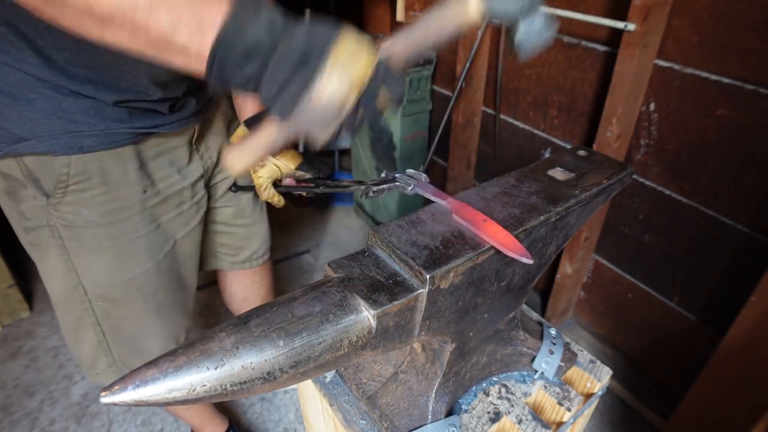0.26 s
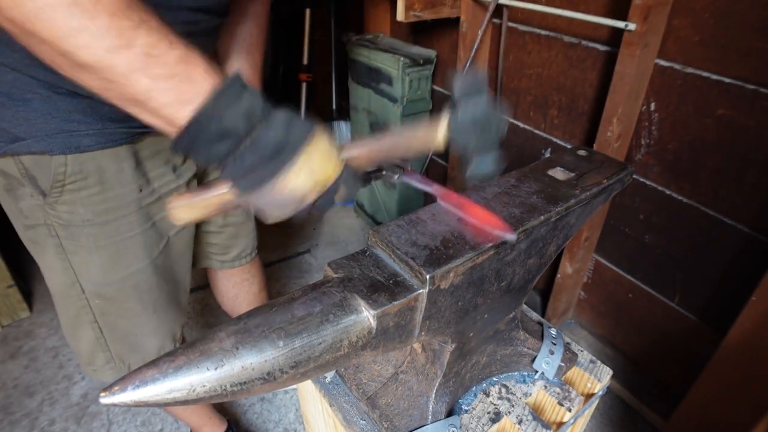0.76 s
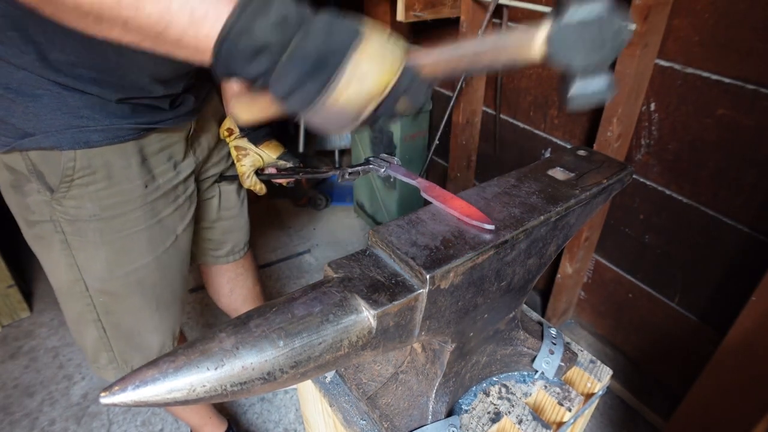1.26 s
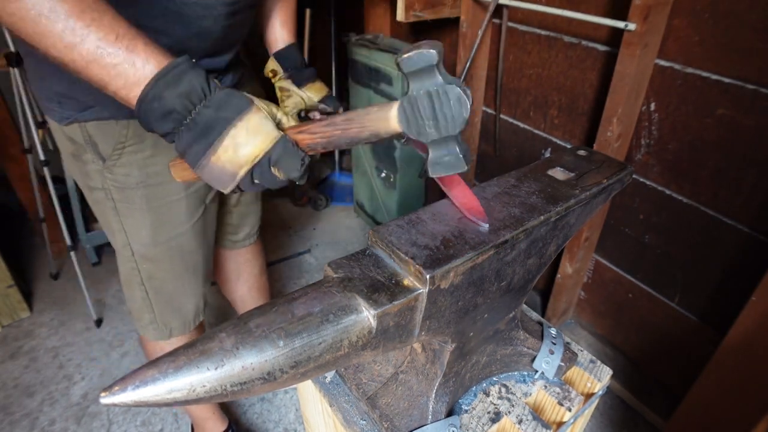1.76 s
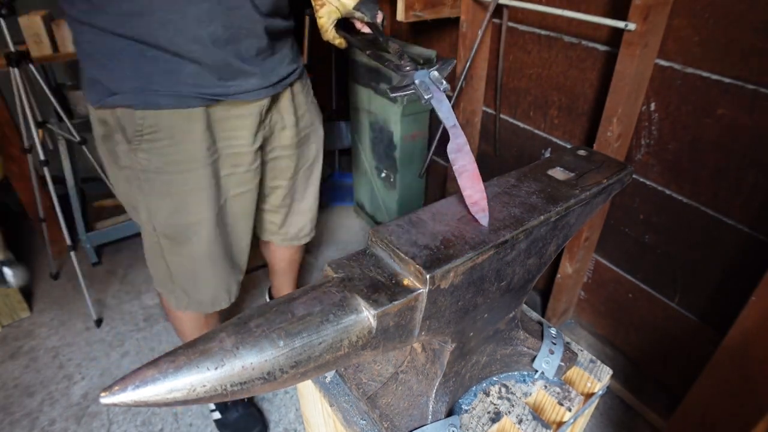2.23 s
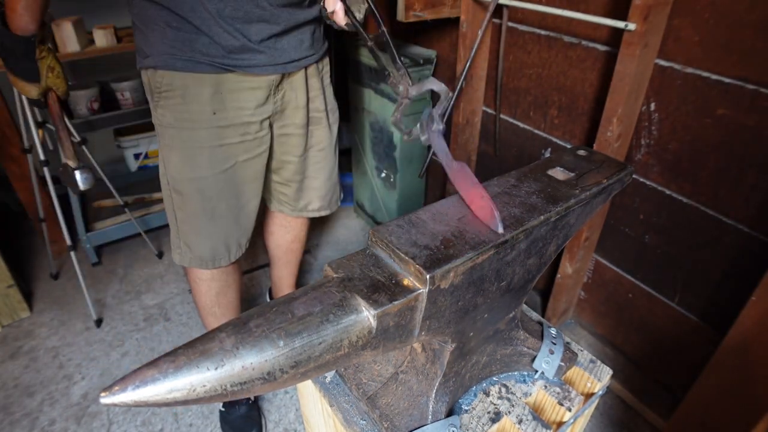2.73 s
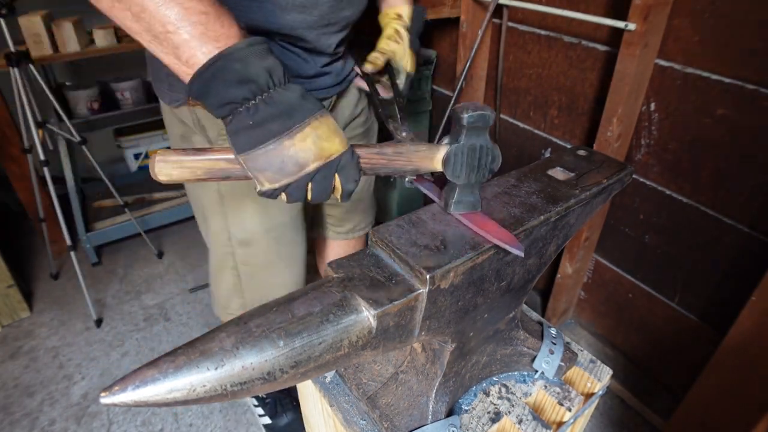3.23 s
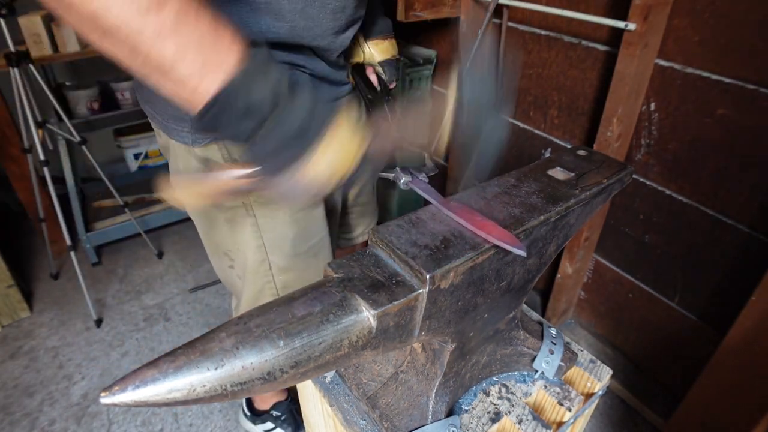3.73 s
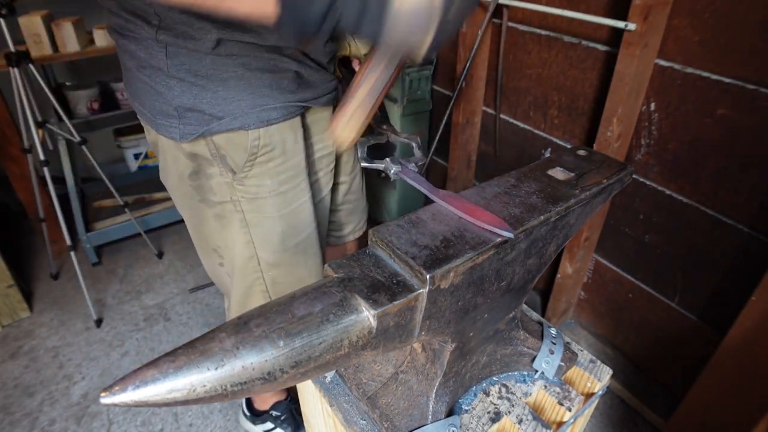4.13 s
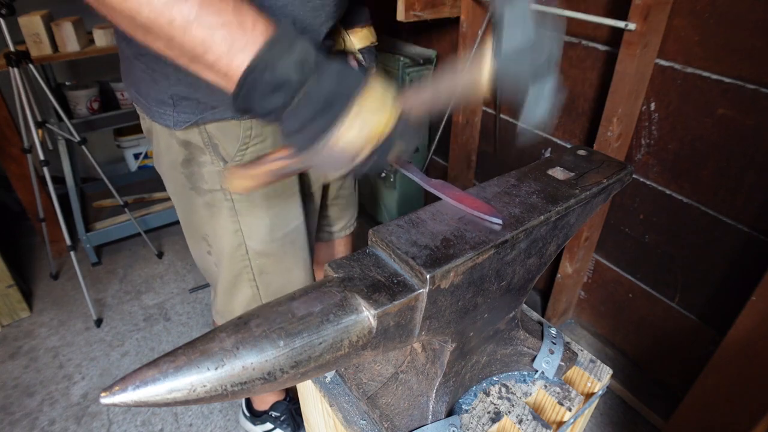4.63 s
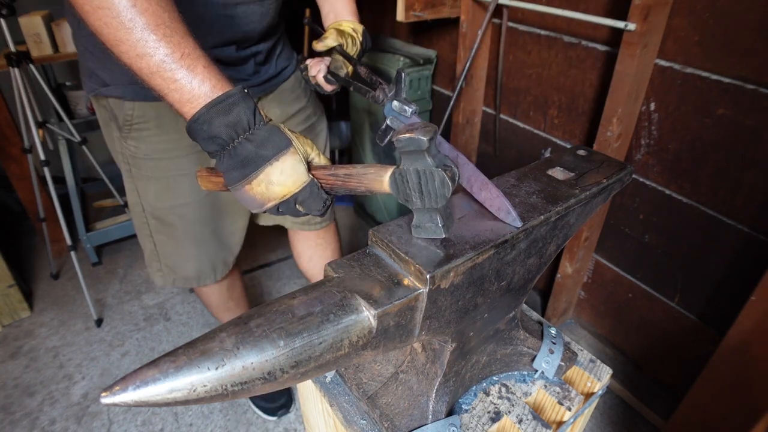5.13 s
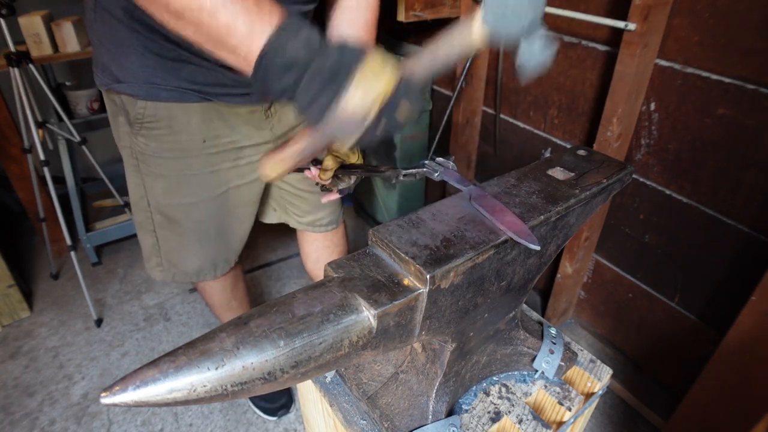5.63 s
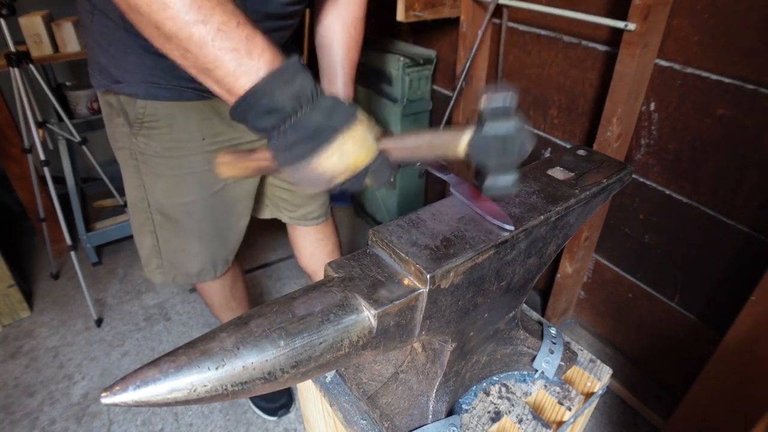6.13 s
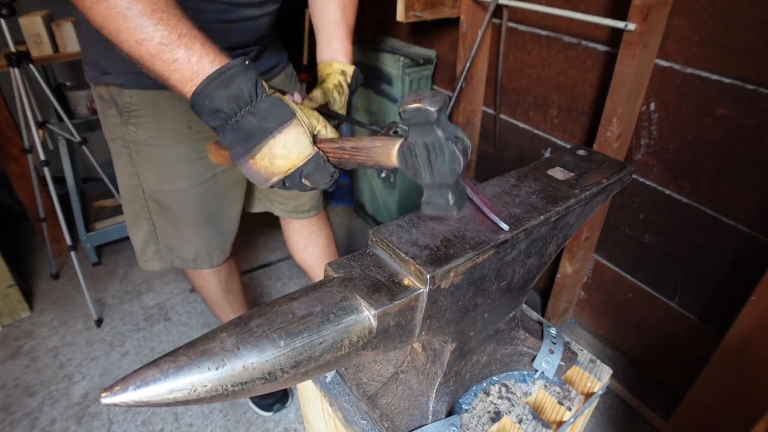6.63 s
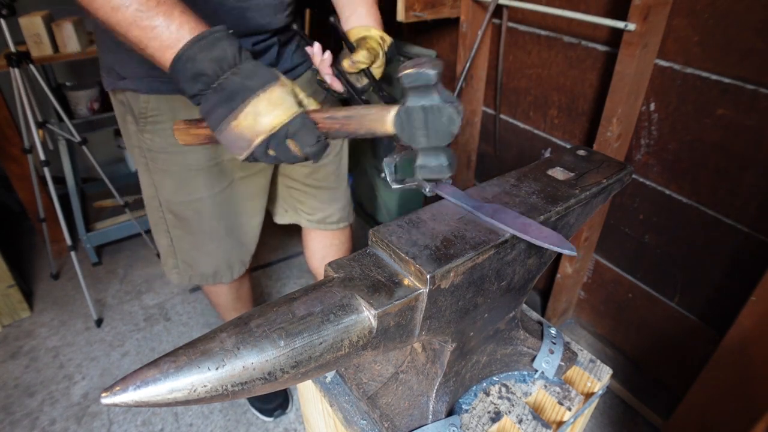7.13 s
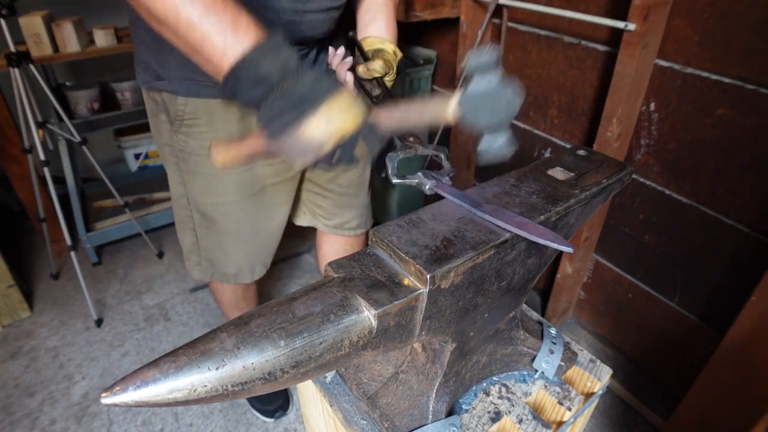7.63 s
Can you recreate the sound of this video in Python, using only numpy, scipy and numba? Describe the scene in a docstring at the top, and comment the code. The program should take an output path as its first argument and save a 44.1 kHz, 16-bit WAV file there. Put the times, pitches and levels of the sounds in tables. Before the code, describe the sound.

A gas forge burner roars and sputters throughout in a small wooden workshop, with a faint high whine above it. A light hammer tap on a hot blade opens a run of ten quick, bright, ringing blows on an anvil, from 0.4 to 1.8 seconds. Around 2 seconds the hammer clatters to rest on the bare anvil. The blade scrapes faintly, and tongs click softly near 3 seconds. Another tap leads to ten more blows from 3.6 to 4.9 seconds, ending in a short bounce. After a click and a soft tap, eight slightly lighter blows run from 5.8 to 6.6 seconds, followed by another rattling bounce. A last tap at 7.3 seconds starts four blows that continue to the end, near 8 seconds. The strikes sound close, with a short ring and tight echo. The roar dips under each run and swells back in the pauses.

```python
"""A gas burner roars and sputters in a small wooden shop, a faint whine above it. A smith forges a red-hot
blade on an anvil in four runs: a light touch to aim, then quick, ringing blows. After each of the first
three runs the hammer drops on the bare face and bounces to rest. The blade scrapes and the tongs click
as it is turned. A limiter flattens every blow, and a slow gain control holds the roar down through a
run and lets it swell back in the pauses."""
import sys
import numpy as np
from scipy import signal
from scipy.fft import rfft, irfft
from scipy.io import wavfile
from scipy.ndimage import uniform_filter1d, minimum_filter1d
from numba import njit

SR = 44100
rng = np.random.default_rng(int(sys.argv[2]) if len(sys.argv) > 2 else 0)


def log_audio(samples):
    """Write samples as a 16-bit WAV file to the path given in sys.argv[1]."""
    # one column per channel
    frames = np.atleast_2d(samples).T
    # limit to full scale, then quantise
    limited = np.clip(frames, -1, 1)
    pcm = np.round(limited * 32767).astype(np.int16)
    wavfile.write(sys.argv[1], SR, pcm)


N = 347067
HIT_SIZE = 12288  # samples in one hit and its tail

# resonances of the forge chamber: (frequency [Hz], width [Hz], level [dB])
CHAMBER_MODES = [(167.3, 23, -17.5), (222, 28, -18), (363, 44, -17), (444, 42, 2), (475, 56.5, 1.5),
                 (570, 73, -4.5), (662, 28, 1.5), (701.8, 41, 3), (770, 23.5, 1.5), (877.3, 39.5, 2),
                 (996, 83, -4.5), (1115, 47, 0.5), (1202, 38, -3.5), (1365, 77, -2.5), (1486, 93, -3),
                 (1617, 109, -5), (1770, 90, -11.5), (1950, 60, -9)]
# broad rush of the flame and gas jet: (frequency [Hz], level [dB])
RUSH_EQ = [(60, -41), (280, -34.5), (420, -16.5), (1650, -18.5), (2150, -21.5), (2550, -22.5), (3100, -33),
           (3500, -30.5), (3750, -25.5), (4100, -38.5), (4650, -30.5), (5080, -27), (5550, -33),
           (6200, -29), (7000, -36.5), (7900, -35.5), (8400, -39), (16000, -39)]
# slow level trim on the steady roar, shaping how it dips and returns with the gain control:
# (time [s], level [dB])
ROAR_TRIM = [(0, 1), (.3, 2), (.6, 1.5), (1.3, 0), (1.7, 0.5), (2.3, -0.5), (3.05, -1.5), (3.2, 2.5),
             (3.8, 1), (4.4, -1), (4.85, 1), (5.35, -0.5), (5.7, 2), (6.1, 0), (7.05, 0.5), (7.3, -1.5),
             (7.87, 0)]
# short puffs of the sputtering flame: (time [s], level against the roar [dB])
FLAME_PUFFS = [(0.046, 4), (.19, 4.5), (.256, 3), (.297, 2.5), (.334, 4.5), (.649, 3.5), (1.547, 4.5),
               (1.64, 4), (1.712, 4.5), (2.217, 4.5), (2.495, 3), (2.589, 6.5), (2.912, 4), (3.168, 4),
               (3.797, 7.5), (4.56, 1.5), (4.827, 5.5), (5.224, 1.5), (5.281, 4.5), (5.561, 4),
               (5.716, 1.5), (5.833, -1), (6.437, 4.5), (6.678, 4), (7.106, 2.5), (7.238, 5.5),
               (7.267, 5.5), (7.309, 3.5), (7.416, 5), (7.448, 3.5), (7.679, 1)]
# tones of the faint, high whine: (frequency [Hz], level [dB])
WHINE_TONES = [(11300, -86), (12242, -83), (12398, -83), (12554, -84), (12868, -84), (13184, -81),
               (13340, -82), (13496, -81), (13652, -84), (14594, -85)]
# hammer set lightly on the blade to aim: (time [s], force [dB], thud [dB])
AIMING_TOUCHES = [(0.1183, -21, 6), (3.26, -19.5, 4), (5.6107, -30, -20), (7.331, -29, 0)]
# colour of the clack on the hot blade: (frequency [Hz], level [dB])
HOT_CLACK_EQ = [(50, -35), (110, -25), (300, -6), (450, -2.5), (1800, 2.5), (2300, 10.5), (2750, 4),
                (3200, 2.5), (3750, 13), (4100, 4), (4450, 6), (4950, 9), (5400, 3), (6500, 3.5), (8700, 6),
                (9900, 0.5), (10600, -1.5), (11800, 4), (13200, 0), (15500, 4)]
# ring of the anvil: (frequency [Hz], level [dB], t60 [s])
ANVIL_MODES = [(3852, -36, .11), (4940, -40, .1), (4967, -37.5, .11), (5330, -46, .11), (12498, -39, .11),
               (13783, -32.5, .17), (15194, -38, .11)]
# ring of the hammer head: (frequency [Hz], level [dB], t60 [s], woken by landing on an edge [0 or 1])
HAMMER_MODES = [(2230, -42, .07, 0), (2310, -43, .06, 0), (3645, -40, .08, 0), (3735, -38, .07, 0),
                (3785, -38, .07, 0), (4750, -44, .06, 0), (4895, -41, .07, 0), (7660, -38.5, .08, 1),
                (7930, -36, .07, 1), (8040, -34, .08, 1), (10960, -38, .05, 0), (11005, -34, .06, 0),
                (11055, -33.5, .06, 0), (11760, -44, .05, 0), (15210, -41, .05, 0)]
# low body of the anvil's stand: (frequency [Hz], level [dB], t60 [s])
STAND_MODES = [(192.7, -41, 0.13), (237, -51, 0.33)]
# ringing hammer blows, on the hot blade but for the last of each of the first two runs, which lands on
# the bare anvil face; edge ring is high off centre, and clank lifts the clank and cuts the clink:
# (time [s], force [dB], anvil ring [dB], hammer ring [dB], edge ring [dB], clank [dB])
HAMMER_BLOWS = [(0.3869, -6.5, -4, -1, -4, 1), (0.534, -4.5, 0, 8, 6, 0.5), (0.6883, -4.5, -0.5, 7, 10, 1),
                (0.8491, -4.5, -3, 4, -12, 1), (1.0074, -3.5, -2, 4, 11, 2.5), (1.1729, -3, -5, 4.5, 6, 0),
                (1.327, -6, -1, 6.5, -10, 0.5), (1.4913, -4.5, -4, 8, -13, -2),
                (1.6536, -5, -6, 8.5, -14, -2), (1.8097, -12, 0, 7.5, 13.5, -2), (3.5628, -4, -2, 2, 11, 1),
                (3.7, -4, -6, 5, 6, 3), (3.837, -4.5, -1, 3, -4, 0.5), (3.973, -7.5, 0, 1, -9, 0),
                (4.1149, -7.5, 0, 6, -16, -1.5), (4.2668, -6, -3, 8, -10, -0.5), (4.4207, -6, 1, 3, -11, 0),
                (4.58, -6.5, -2, 10.5, 6, -2.5), (4.7406, -5.5, -4, 11, 10, -4),
                (4.8765, -10, 1.5, 9, 12, -.5), (5.7524, -6.5, -6, 4, 3, 0.5), (5.877, -7, -2, 4.5, 10, 0),
                (5.9978, -10.5, -12, -10, -2, 0.5), (6.1156, -10.5, -11, -1, -13, 0),
                (6.227, -9, -16, 2, -6, 0), (6.3457, -9.5, -15, 8.5, 4, -3),
                (6.4626, -7.5, -5, 7.5, -13, 0), (6.5735, -10, -15, 9, -3, -2.5),
                (7.4736, -9, -8, 5.5, -1, -2), (7.5918, -9, -4, 1, -12, -1.5),
                (7.7143, -9.5, -0.5, 1, -19, -2.5), (7.835, -8, -10, 0, -11, -1)]
# colour of the blade's gritty scrape: (frequency [Hz], level [dB])
GRIT_EQ = [(1500, -30), (3300, -11), (3800, 6), (4300, -4), (5050, -7), (5600, -5), (6500, -2), (7200, -6),
           (8000, -8), (10000, -7), (15000, -22)]
# hammer bouncing to rest on the bare face: (time [s], force [dB], anvil ring [dB], edge ring [dB])
HAMMER_BOUNCES = [(1.9124, -9.5, -2, 0), (1.9715, -12, -6, 3), (2.0068, -17, -5, 3),
                  (2.0297, -19.5, -5, -2), (2.045, -22.5, -3, -6), (2.058, -26, -3, -4),
                  (2.0924, -18.5, -3, 0), (2.1277, -25, -3, 6), (4.969, -10.5, -1, 3), (5.0177, -15, -1, 3),
                  (5.0465, -20, 2, -7), (6.7, -10, 4.5, -4), (6.7644, -14, 1, -1), (6.8063, -13, 1, 1),
                  (6.8359, -22, 0, 1), (6.851, -19.5, 0, 4), (6.8605, -29, 0, -2)]
# colour of the clack on the bare face: (frequency [Hz], level [dB])
BARE_CLACK_EQ = [(100, -33), (300, -5.5), (450, -9), (2400, 7.5), (2750, 2.5), (2950, 8.5), (3250, 3.5),
                 (3700, 7), (4150, 6.5), (4800, 8), (6400, 1.5), (7900, 15), (8700, 8), (10200, 5),
                 (11700, 5), (15500, 4.5)]
# tongs shifting on the blade: (time [s], force [dB])
TONG_CLICKS = [(2.93, -46), (2.975, -42), (3.165, -41), (3.18, -35.5), (5.412, -37.5), (7.273, -44)]
# ring of the blade: (frequency [Hz], level [dB], t60 [s])
BLADE_MODES = [(3900, -36, .09), (4120, -42, .06), (6400, -38, .08)]
# stereo width: (frequency [Hz], side gain [dB])
SIDE_EQ = [(100, -40), (350, -25), (500, -59), (750, -25), (1400, -17.5), (2800, -10), (8000, -8),
           (12000, -7.5), (16000, -6)]


def undb(db):
    """Decibels to gain."""
    return 10 ** (np.asarray(db) / 20)


def unit_rms(x):
    """Scale to rms 1."""
    return x / np.sqrt(np.mean(x ** 2))


def freqs(size):
    """Frequency of each bin of a spectrum, 1 Hz at the least."""
    return np.maximum(np.arange(size // 2 + 1) * SR / size, 1)


def eq_curve(points, hz):
    """Gain of an EQ drawn through (Hz, dB) points on a log-frequency axis."""
    point_hz, db = np.transpose(points)
    return undb(np.interp(np.log(hz), np.log(point_hz), db))


def colour(x, gain):
    """Minimum-phase EQ on each channel, by way of the cepstrum: attacks stay sharp."""
    size = x.shape[-1]
    cepstrum = irfft(np.log(gain + 1e-9), size)
    cepstrum[1:size // 2] *= 2
    cepstrum[size // 2 + 1:] = 0
    return irfft(rfft(x) * np.exp(rfft(cepstrum)), size)


def stereo(mid, side):
    """Mid and side to left and right: narrow in the bass, wider in the treble."""
    side = colour(side, eq_curve(SIDE_EQ, freqs(len(side))))
    return np.array([mid + side, mid - side])


def wander(rate_hz):
    """Random modulator: held steps smoothed twice, with a spread near 1."""
    hold = int(SR / rate_hz)
    steps = np.repeat(rng.standard_normal(N // hold + 1), hold)
    return 1.18 * uniform_filter1d(uniform_filter1d(steps, hold), hold)[:N]


def add(out, time_s, sound):
    """Mix a sound in at the given time."""
    start = int(time_s * SR)
    out[:, start:start + sound.shape[-1]] += sound[..., :N - start]


def burner(level_db=-37, flutter_hz=80, flutter_db=3.0, rush_db=-1, rush_flutter_db=2.5,
           mouth_hz=150, puff_s=0.012):
    """The steady, turbulent flame flutters, puffs and rings the chamber; the gas jet hisses along."""
    t, hz = np.arange(N) / SR, freqs(N)
    chamber_power = sum(undb(2 * db) / (1 + ((hz - mode_hz) / (0.62 * width_hz)) ** 2) ** 2
                        for mode_hz, width_hz, db in CHAMBER_MODES)
    chamber_eq = np.sqrt(chamber_power) / (1 + (mouth_hz / hz) ** 2)  # a small mouth gives little bass
    rush_eq = undb(rush_db) * eq_curve(RUSH_EQ, hz)
    eddies = wander(flutter_hz)
    drift = uniform_filter1d(eddies, size=4000)
    flutter = 2 * np.tanh((eddies - drift) / 2)  # quick sputter only: the gas feed is even
    trim_db = np.interp(t, *np.transpose(ROAR_TRIM))
    puffs_db = sum(db * np.exp(-((t - time_s) / puff_s) ** 2) for time_s, db in FLAME_PUFFS)
    mid_side = []
    for _ in range(2):
        roar = colour(rng.standard_normal(N) * undb(flutter_db * flutter), chamber_eq)
        rush = colour(rng.standard_normal(N) * undb(rush_flutter_db * flutter), rush_eq)
        mid_side.append(unit_rms(roar + rush))
    return stereo(*mid_side) * undb(level_db + trim_db + puffs_db)


def whine(gain_db=6, waver_db=2):
    """Thin tones high above the roar, each wavering in level and phase."""
    t = np.arange(N) / SR
    tones = np.zeros(N)
    for hz, db in WHINE_TONES:
        amplitude = np.sqrt(2) * undb(db + waver_db * wander(rate_hz=15))
        tones += amplitude * np.sin(2 * np.pi * hz * t + wander(rate_hz=17))
    return tones * undb(gain_db)


def ring(modes, detune_hz=2):
    """Decaying modes; their shares and signs vary with the spot that is struck."""
    t = np.arange(HIT_SIZE) / SR
    out = np.zeros(HIT_SIZE)
    for hz, db, t60 in modes:
        spot_db, detune, polarity = rng.standard_normal(3)
        decay = undb(db + spot_db - 60 * t / t60)
        out += np.sign(polarity) * decay * np.cos(2 * np.pi * (hz + detune_hz * detune) * t)
    return out


def hammer_ring(centre_db, edge_db):
    """The head's ring: landing on an edge wakes a shrill cluster of its own."""
    return ring([(hz, db + (edge_db if on_edge else centre_db), t60)
                 for hz, db, t60, on_edge in HAMMER_MODES])


def shop_echo(t60_s=0.12, build_s=0.0023, treble_t60_ratio=0.78, split_hz=6500):
    """Short, dense echo off wooden walls; the treble dies first. New each time, as the smith moves."""
    t = np.arange(HIT_SIZE) / SR
    noise = rng.standard_normal(HIT_SIZE)
    lows = irfft(rfft(noise) / (1 + (freqs(HIT_SIZE) / split_hz) ** 4), HIT_SIZE)
    fall_db = -60 * t / t60_s
    tail = lows * undb(fall_db) + (noise - lows) * undb(fall_db / treble_t60_ratio)
    echo = tail * (1 - np.exp(-t / build_s))
    return echo / np.linalg.norm(echo)


def strike(clack_eq, tilt_db_per_octave, ringing, room_db=0, contact_s=0.00078,
           clack_db=6, wet_ring_db=-8.5):
    """A millisecond of steel contact and the ring that it leaves, direct and through the shop."""
    t, hz = np.arange(HIT_SIZE) / SR, freqs(HIT_SIZE)
    octaves = np.log2(np.maximum(hz, 2000) / 5000)  # the tilt pivots at 5 kHz, flat below 2 kHz
    tilted_eq = eq_curve(clack_eq, hz) * undb(tilt_db_per_octave * octaves)
    mid_side = []
    for _ in range(2):
        crack = rng.standard_normal(HIT_SIZE) * np.exp(-t / contact_s)
        echo = shop_echo()
        clack = colour(crack / np.linalg.norm(crack) + undb(room_db) * echo, tilted_eq)
        wet_ring = signal.fftconvolve(ringing, echo)[:HIT_SIZE]
        mid_side.append(undb(clack_db) * clack + undb(wet_ring_db) * wet_ring)
    mid, side = mid_side
    return stereo(mid + ringing, side)


def thudding_hit(tilt_db_per_octave, ringing, thud_db, thud_s=0.0026):
    """One contact with the clack of soft, hot steel; the push goes on through the anvil into its stand."""
    t = np.arange(HIT_SIZE) / SR
    thud = undb(thud_db) * t / thud_s * np.exp(1 - t / thud_s)
    stand = ring(STAND_MODES) * (1 - np.exp(-t / thud_s))
    return strike(HOT_CLACK_EQ, tilt_db_per_octave, ringing) + stand + thud


def lesser_modes(hits, ripple_db=2.7, spacing_hz=45, full_above_hz=1500, clear_hz=55):
    """Weak resonances between the steel's main modes: one fine ripple that colours every hit alike."""
    hz = freqs(N)
    ripple = np.interp(hz / spacing_hz, np.arange(2000), rng.uniform(-1, 1, 2000))
    to_main_hz = np.min([np.abs(hz - mode[0]) for mode in ANVIL_MODES + HAMMER_MODES], axis=0)
    depth = np.minimum(to_main_hz / clear_hz, 1) * np.minimum(hz / full_above_hz, 1) ** 2
    return colour(hits, undb(ripple_db * depth * ripple))


def aiming_touches(gain_db=6, anvil_db=-1, hammer_db=-3, tilt_db_per_octave=6.0, thud_db=-40):
    """The hammer stays on the blade: a bright tick and a thud, with little ring."""
    out = np.zeros((2, N))
    for time_s, force_db, thud_trim_db in AIMING_TOUCHES:
        ringing = undb(anvil_db) * ring(ANVIL_MODES) + hammer_ring(hammer_db, hammer_db)
        touch = thudding_hit(tilt_db_per_octave, ringing, thud_db + thud_trim_db)
        add(out, time_s, undb(gain_db + force_db) * touch)
    return out


def hammer_blows(gain_db=6, anvil_db=8.5, hammer_db=7.5, edge_db=4, thud_db=-53,
                 tilt_db_per_octave=0.51, clank_hz=3760, clink_hz=4950, width_hz=380):
    """Ringing blows: where and how squarely the head lands sets the ring, and a clank or a clink."""
    out, hz = np.zeros((2, N)), freqs(HIT_SIZE)
    clank_band = np.exp(-((hz - clank_hz) / width_hz) ** 2)
    clink_band = np.exp(-((hz - clink_hz) / width_hz) ** 2)
    for time_s, force_db, anvil_trim_db, hammer_trim_db, edge_trim_db, clank_db in HAMMER_BLOWS:
        anvil = undb(anvil_db + anvil_trim_db) * ring(ANVIL_MODES)
        hammer = hammer_ring(hammer_db + hammer_trim_db, edge_db + edge_trim_db)
        blow = thudding_hit(tilt_db_per_octave, anvil + hammer, thud_db)
        seesaw_eq = undb(clank_db * (clank_band - clink_band))
        add(out, time_s, undb(gain_db + force_db) * colour(blow, seesaw_eq))
    return out


def blade_scrape(start_s=1.8, end_s=4.2, level_db=-64, slips_per_s=120, scatter_db=2):
    """The tip drags over the face, catching and slipping on grains of scale; the shop smears the grit."""
    t = np.arange(N) / SR
    slips = (rng.random(N) < slips_per_s / SR) * undb(scatter_db * rng.standard_normal(N))
    progress = np.clip((t - start_s) / (end_s - start_s), 0, 1)
    pressure = np.sqrt(np.maximum(np.sin(np.pi * progress), 0))
    smears = [signal.fftconvolve(slips, shop_echo())[:N] for _ in range(2)]
    mid, side = (unit_rms(colour(smear, eq_curve(GRIT_EQ, freqs(N)))) for smear in smears)
    return stereo(mid, side) * pressure * undb(level_db)


def hammer_bounces(gain_db=7, anvil_db=5, hammer_db=14, edge_db=12.5,
                   bright_hz=24000, force_db_per_octave=13):
    """Hard steel on hard steel: a weaker bounce means a longer contact, so its tick is duller."""
    out = np.zeros((2, N))
    for time_s, force_db, anvil_trim_db, edge_trim_db in HAMMER_BOUNCES:
        anvil = undb(anvil_db + anvil_trim_db) * ring(ANVIL_MODES)
        hammer = hammer_ring(hammer_db, edge_db + edge_trim_db)
        tick = strike(BARE_CLACK_EQ, 0, anvil + hammer, room_db=-3.5, contact_s=0.0013)
        corner_hz = bright_hz * 2 ** (force_db / force_db_per_octave)
        lowpass = 1 / np.sqrt(1 + (freqs(HIT_SIZE) / corner_hz) ** 6)
        add(out, time_s, undb(gain_db + force_db) * colour(tick, lowpass))
    return out


def tong_clicks(tilt_db_per_octave=0.5, ring_db=14):
    """The tongs shift in light clicks that ring the blade as it is turned."""
    out = np.zeros((2, N))
    for time_s, force_db in TONG_CLICKS:
        click = strike(HOT_CLACK_EQ, tilt_db_per_octave, undb(ring_db) * ring(BLADE_MODES))
        add(out, time_s, undb(force_db) * click)
    return out


def scene():
    """The hammer work over a bed of roar, whine and scrape."""
    bed = burner() + whine() + blade_scrape()
    hits = hammer_blows() + aiming_touches() + hammer_bounces() + tong_clicks()
    return bed + lesser_modes(hits)


@njit
def peak_follower(x, release):
    """The limiter's detector: jumps to every peak and falls back exponentially."""
    out, peak = np.empty(len(x)), 0.
    for i in range(len(x)):
        peak = max(x[i], peak * release)
        out[i] = peak
    return out


@njit
def slow_ducking(wanted_db, cut_db, attack, recovery_db):
    """Gain cut in dB: eases up to what is wanted, and falls back by a steady step per sample."""
    out = np.empty(len(wanted_db))
    for i in range(len(out)):
        if wanted_db[i] > cut_db:
            cut_db += attack * (wanted_db[i] - cut_db)
        else:
            cut_db = max(cut_db - recovery_db, 0.)
        out[i] = cut_db
    return out


def record(dry, ceiling_db=-24, release_s=0.013, top_hz=15700,
           max_duck_db=13.0, start_duck_db=7.0, attack_s=0.081, recovery_db_per_s=11):
    """A fast limiter, a slow gain control that follows its work, then a steep treble cut-off."""
    peak = peak_follower(np.abs(dry).max(axis=0), np.exp(-1 / (release_s * SR)))
    over_db = np.maximum(20 * np.log10(peak + 1e-9) - ceiling_db, 0)
    wanted_db = np.minimum(over_db, max_duck_db)
    duck_db = slow_ducking(wanted_db, start_duck_db, 1 / (attack_s * SR), recovery_db_per_s / SR)
    gain = undb(-np.maximum(over_db, duck_db))
    gain = uniform_filter1d(minimum_filter1d(gain, size=17), size=17)  # short look-ahead
    lowpass = signal.ellip(8, .2, 70, top_hz, fs=SR, output="sos")
    return signal.sosfilt(lowpass, dry * gain)


dry = scene()
out = record(dry)
log_audio(out)
```